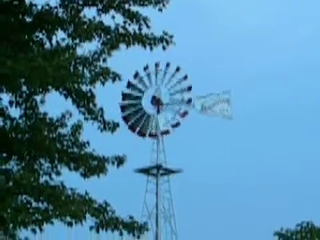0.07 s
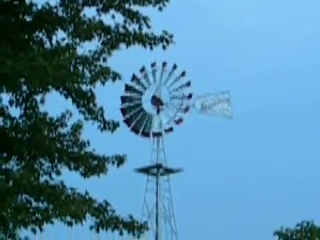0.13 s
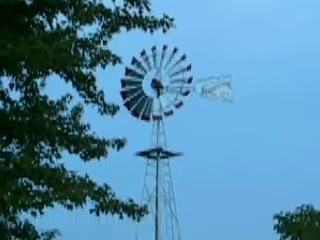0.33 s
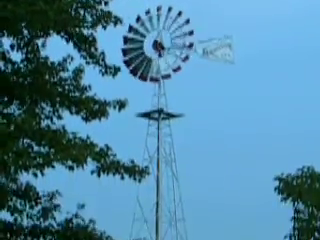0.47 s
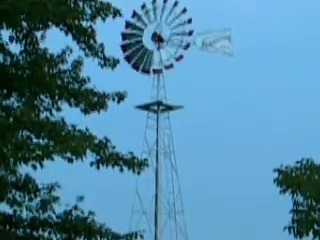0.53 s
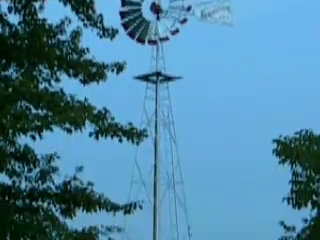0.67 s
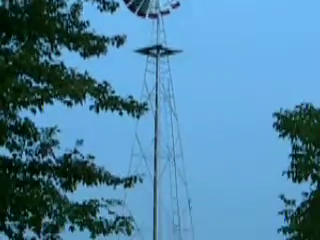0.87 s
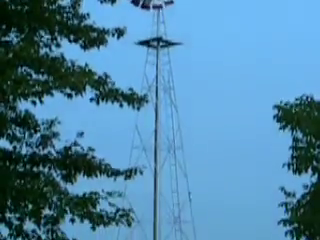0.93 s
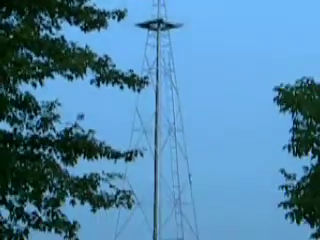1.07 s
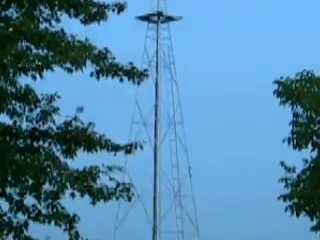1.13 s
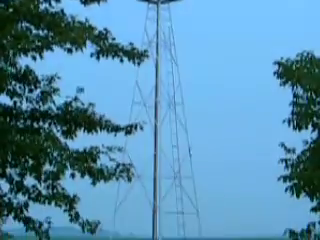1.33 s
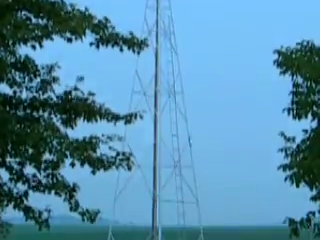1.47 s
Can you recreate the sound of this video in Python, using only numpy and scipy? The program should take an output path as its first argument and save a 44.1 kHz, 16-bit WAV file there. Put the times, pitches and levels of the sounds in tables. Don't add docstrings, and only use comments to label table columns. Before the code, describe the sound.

Two loud, clipped knocks on a hand-held camera body, a quarter second apart, then a tiny rattle; soft wind in leaves dips and recovers, with faint birds and dull finger thumps, outdoors on a farm.

```python
import sys
import numpy as np
from scipy import signal
from scipy.fft import rfft, irfft
from scipy.io import wavfile
from scipy.ndimage import uniform_filter1d

SR = 44100
rng = np.random.default_rng(int(sys.argv[2]) if len(sys.argv) > 2 else 0)


def volts_from_decibels(level):
    exponent = np.asarray(level, float) / 20
    return 10 ** exponent


def persist_wave(psi):
    counts = np.round(np.clip(psi, -1, 1) * 32767).astype(np.int16)
    wavfile.write(sys.argv[1], SR, np.atleast_2d(counts).T)


N = 66150


def evened(x):
    return x / np.sqrt(np.mean(x ** 2) + 1e-20)


def add(mix, s, sound):
    part = mix[round(s * SR):][:len(sound)]
    part += sound[:len(part)]


# t/s, level/dB
WIND_LEVEL = [(0, -33), (.2, -33.5), (.3, -34), (0.491, -33.5), (0.531, -47.5), (.63, -47.5), (.75, -43),
              (.9, -37.5), (1.05, -34.5), (1.248, -34), (1.5, -33)]
# f/Hz, level/dB (per Hz)
AIR_SPECTRUM = [(24, -56), (40, -22), (102, -13.5), (228, -12), (462, -8), (710, -10.5), (799, -5.5),
                (2640, -14.5), (4300, -29.5), (5590, -63), (9460, -120)]
# f/Hz, width/Hz, level/dB
MIC_HOLLOWS = [(96.5, 20, 6), (196, 80, 6), (503.5, 61, 7), (611, 240, -2.5), (816, 48, 5.5), (956, 17, 7),
               (1075, 38, 5.5), (1455, 120, 4), (2600, 400, 0)]


def wind():
    flicker_db = 0.43
    frames = N // 256 + 5
    real, imag = rng.standard_normal((frames, 513, 2)).T
    flicker = evened(uniform_filter1d(rng.standard_normal(frames), size=3))
    spectra = (real + 1j * imag) * volts_from_decibels(flicker_db * flicker)
    raw = signal.istft(spectra, nperseg=1024, noverlap=768)[1][:N]

    f = np.fft.rfftfreq(N, 1 / SR)
    air_hz, air_db = np.transpose(AIR_SPECTRUM)
    colour_db = np.interp(np.log(f + 1), np.log(air_hz + 1), air_db, right=-90)
    for centre_hz, width_hz, db in MIC_HOLLOWS:
        colour_db = colour_db + db / (1 + ((f - centre_hz) / (.5 * width_hz)) ** 2)
    coloured = evened(irfft(rfft(raw) * volts_from_decibels(colour_db), N))

    t_s, level_db = np.transpose(WIND_LEVEL)
    return coloured * volts_from_decibels(np.interp(np.arange(N) / SR, t_s, level_db))


# t/s, length/s, level/dB (rms), start f/Hz, end f/Hz
BIRD_NOTES = [(.12, .04, -47, 2350, 2450), (.183, .022, -41, 2820, 2560), (.207, .035, -42, 2570, 2720),
              (.293, .018, -43, 2740, 2680), (.31, .035, -42, 2550, 2440), (.352, .024, -40, 2900, 2580),
              (.376, .05, -41, 2570, 2660), (.42, .075, -43, 2620, 2600), (.35, .03, -53, 3950, 3900),
              (.755, .028, -47, 2500, 2550), (.78, .016, -47, 2480, 2250), (.842, .045, -45, 2660, 2790),
              (.875, .022, -46, 2620, 2350), (.93, .055, -45, 2120, 2020), (1.065, .02, -44, 1920, 1830),
              (1.095, .045, -46, 2620, 2450), (1.22, .035, -44, 2700, 2450), (1.255, .018, -43, 2560, 2740),
              (1.32, .035, -42, 2600, 2740), (1.36, .03, -41, 2450, 2560), (1.395, .045, -43, 2560, 2460),
              (1.385, .018, -44, 3060, 3130), (1.39, .04, -45, 1840, 1910), (1.46, .03, -43, 2500, 2480)]


def birds():
    warble, fading_db = .013, 2.5
    out = np.zeros(N)
    waver = evened(uniform_filter1d(rng.standard_normal((2, N)), size=300))
    for s, length_s, db, from_hz, to_hz in BIRD_NOTES:
        u = np.linspace(0, 1, round(length_s * SR))
        pitch_waver, level_waver = waver[:, round(s * SR):][:, :len(u)]
        u = u[:len(pitch_waver)]
        hz = (from_hz + (to_hz - from_hz) * u) * (1 + warble * pitch_waver)
        level = np.sqrt(2) * volts_from_decibels(db + fading_db * level_waver)
        envelope = np.abs(np.sin(np.pi * u)) ** 0.2
        add(out, s, level * envelope * np.sin(2 * np.pi * np.cumsum(hz) / SR))
    return out


def ring(modes, rise_s, tilt_db=0, stretch=1):
    t = np.arange(SR // 2) / SR
    hz, db, t60_s = np.transpose(modes)[:, :, None]
    level = volts_from_decibels(db + tilt_db * np.log2(hz / 200) - 60 * t / t60_s)
    tone = level * np.sin(2 * np.pi * hz * stretch * t)
    return tone.sum(0) * (1 - np.exp(-t / rise_s))


# f/Hz, level/dB, t60/s
SOFT_MODES = [(103.6, -9.5, 0.28), (188, 3, 0.072), (346, -5.5, 0.096), (520, -13, 0.044),
              (574, -12, 0.041), (900, -11, 0.015)]
# t/s, level/dB, brightness/(dB per octave)
NUDGE_EVENTS = [(0.194, -35.5, 14), (0.21, -40.5, 17), (0.287, -27.5, 4), (.673, -35.5, -2),
                (0.765, -36, -1.5), (0.807, -47.5, -6.5), (.869, -47, -18.5), (1.039, -31, -5.5),
                (1.085, -23.5, 4.5), (1.165, -22.5, -4.5), (1.206, -37.5, -0.5), (1.448, -24, -3.5),
                (1.479, -31.5, -8)]


def nudges():
    rise_s, max_detune = .003, 0.058
    out = np.zeros(N)
    for s, db, tilt_db in NUDGE_EVENTS:
        stretch = 1 + max_detune * rng.uniform(-0.47, 1)
        add(out, s, -volts_from_decibels(db) * ring(SOFT_MODES, rise_s, tilt_db, stretch))
    return out


def strike(contacts, modes, sign, crack_rise_s, grit):
    blow_rise_s, crack_t60_s = .0006, .008
    out, t = np.zeros(N), np.arange(SR // 20) / SR
    rise = np.minimum(t / crack_rise_s, 1)
    shape = rise * volts_from_decibels(-60 * np.maximum(t - crack_rise_s, 0) / crack_t60_s)
    for s, blow_db, crack_db, crack_hz in contacts:
        add(out, s, sign * volts_from_decibels(blow_db) * ring(modes, blow_rise_s))
        tone = np.sin(2 * np.pi * crack_hz * t)
        add(out, s, volts_from_decibels(crack_db) * shape * (tone + grit * rng.standard_normal(len(t))))
    return out


# f/Hz, level/dB, t60/s
FIRST_MODES = [(108.25, -30, 0.97), (203.5, 0, 0.05), (348.5, -8, 0.063), (414.7, 0, 0.091),
               (635, -2, 0.051), (721.5, -2.5, 0.041), (960, -11.5, 0.052), (1041.5, -7, 0.11),
               (1263, -2, 0.024), (1462, -10, 0.04), (2380, -23.5, .04), (2700, -23.5, 0.0199),
               (3420, -25.5, .02)]
# t/s, blow level/dB, crack level/dB, crack f/Hz
FIRST_CONTACTS = [
    (.2490, -36.5, -3.5, 2813),
    (.2496, -38, -6, 3709),
    (.2513, -0.5, -10, 2224),
    (.2545, -8, -26.5, 3420),
    (.2596, -17.5, -18.5, 2700),
    (.2618, -29.5, -25, 450),
]


def first_knock():
    return strike(FIRST_CONTACTS, FIRST_MODES, -0.83, crack_rise_s=.0020, grit=1.3)


# f/Hz, level/dB, t60/s
SECOND_MODES = [(110, -8, .05), (250, -4, .05), (380, -7, .045), (484, -1, .04), (720, -6, .03),
                (860, -4, .025), (1100, -6, .025), (1357, -7, .025), (1750, -12, .02), (2476, -14, .02),
                (3700, -30, .03)]
# t/s, blow level/dB, crack level/dB, crack f/Hz
SECOND_CONTACTS = [
    (.4972, -14, 4, 680),
    (.4968, -40, -10, 2450),
    (.4971, -40, -14, 1450),
    (.5024, -14, -30, 3100),
]


def second_knock():
    return strike(SECOND_CONTACTS, SECOND_MODES, 0.82, crack_rise_s=.0015, grit=.08)


# f/Hz, level/dB, t60/s
RATTLE_MODES = [(185, -4, 0.097), (365, 2, 0.11), (644, -4.5, 0.088), (870, -9, 0.089), (946, -11, 0.066),
                (1880, -34, 0.073)]
# t/s, blow level/dB, crack level/dB, crack f/Hz
RATTLE_CONTACTS = [
    (.5378, -33, -36, 700),
    (.5432, -25, -25, 520),
    (.5475, -32, -30, 800),
    (.556, -36, -34, 900),
]


def rattle():
    return strike(RATTLE_CONTACTS, RATTLE_MODES, -1, crack_rise_s=.0015, grit=.08)


def scene():
    return (wind() + birds() + nudges() + first_knock() + second_knock() + rattle())[None]


def low_pass(x):
    return signal.sosfilt(signal.butter(12, 16790, fs=SR, output="sos"), x)


def record(dry):
    mic_low_hz, self_low_hz, edge_hz, smooth_hz = 55, 900, 3867, 8800
    self_noise_db, hiss_db = -45.5, -105
    full_scale, offset, edge_fade_s = .7, -0.012, .003

    thin = signal.lfilter(*signal.butter(2, mic_low_hz, "high", fs=SR), dry)
    noise = signal.lfilter(*signal.butter(1, self_low_hz, "high", fs=SR), rng.standard_normal(dry.shape))
    edge = signal.firwin(161, edge_hz, window=("kaiser", 9), fs=SR)[None]
    narrow = signal.oaconvolve(thin + volts_from_decibels(self_noise_db) * noise, edge, "same")

    t = np.arange(N) / SR
    fade = np.clip(np.minimum(t, t[::-1]) / edge_fade_s, 0, 1)
    clipped = np.clip(narrow * fade + offset, -full_scale, full_scale) - offset
    smooth = signal.lfilter(*signal.butter(1, smooth_hz, fs=SR), clipped) + offset
    mix = smooth + volts_from_decibels(hiss_db) * rng.standard_normal(dry.shape)
    return low_pass(mix)


dry = scene()
out = record(dry)
persist_wave(out)
```